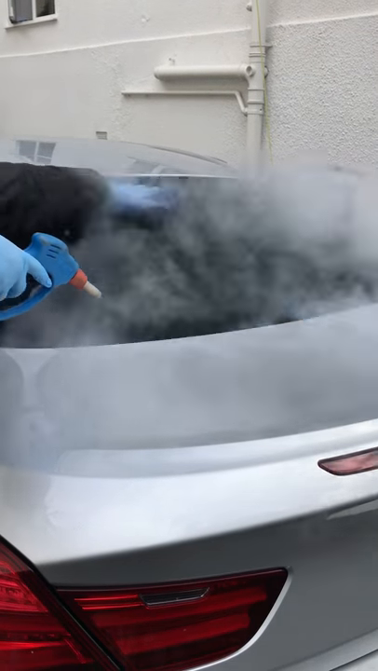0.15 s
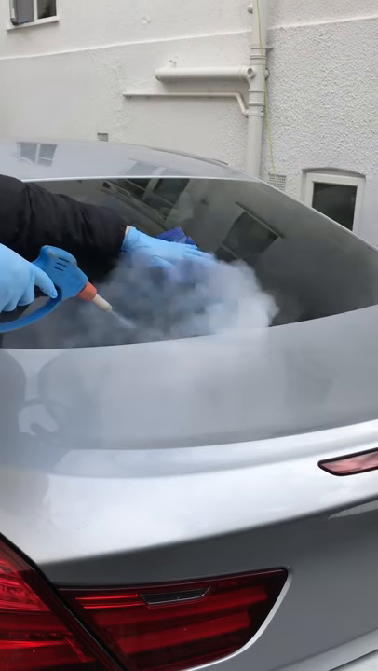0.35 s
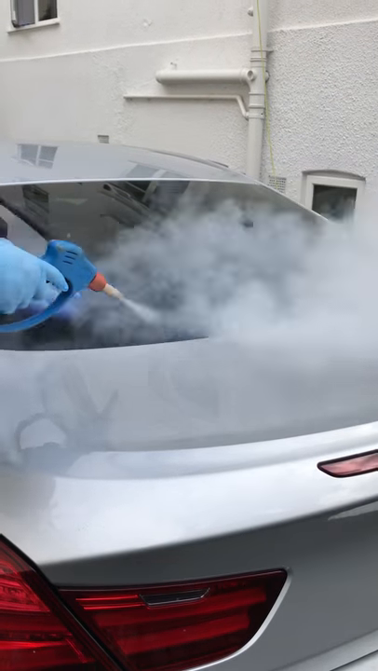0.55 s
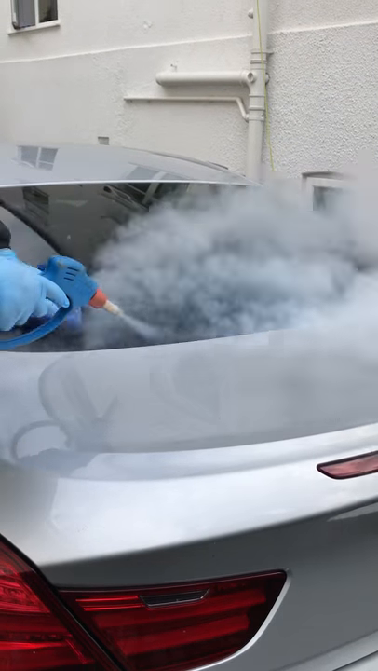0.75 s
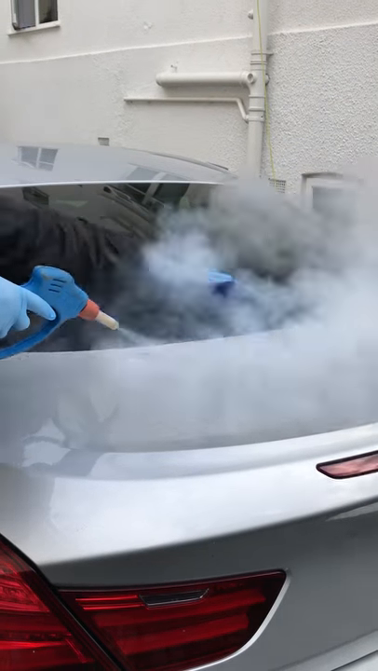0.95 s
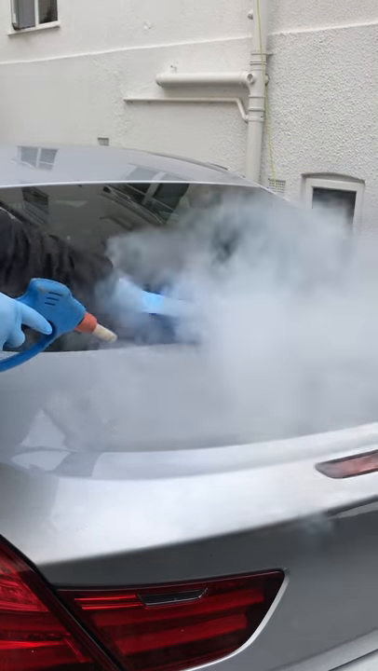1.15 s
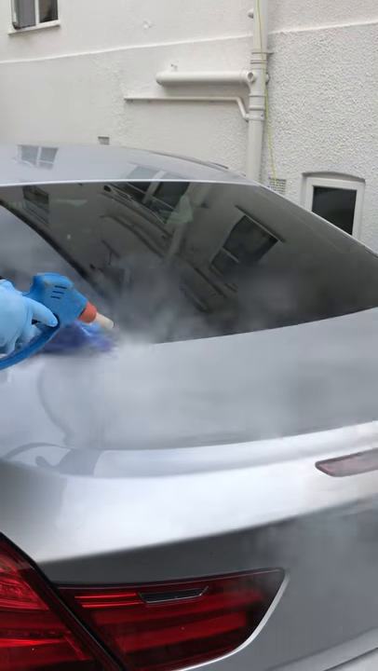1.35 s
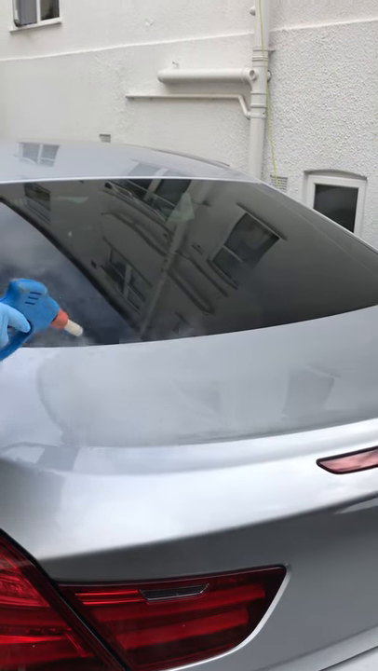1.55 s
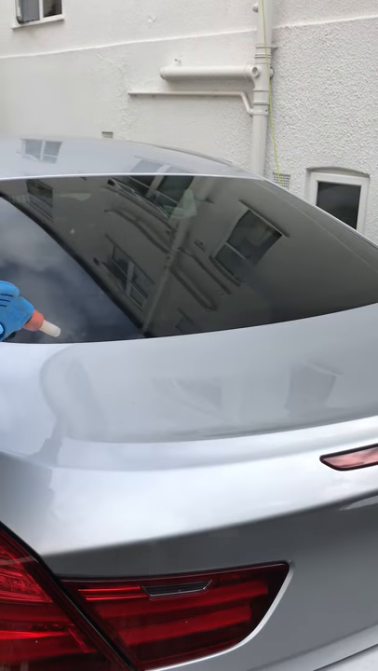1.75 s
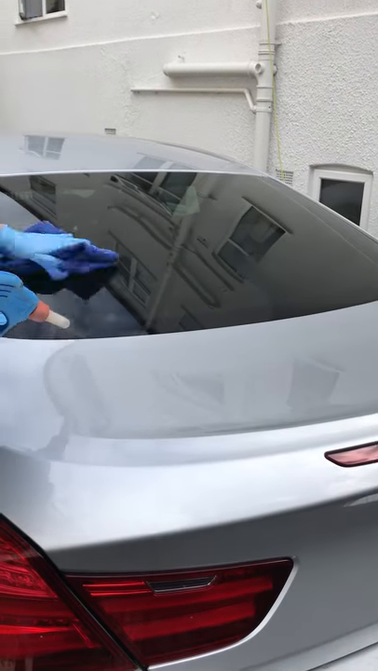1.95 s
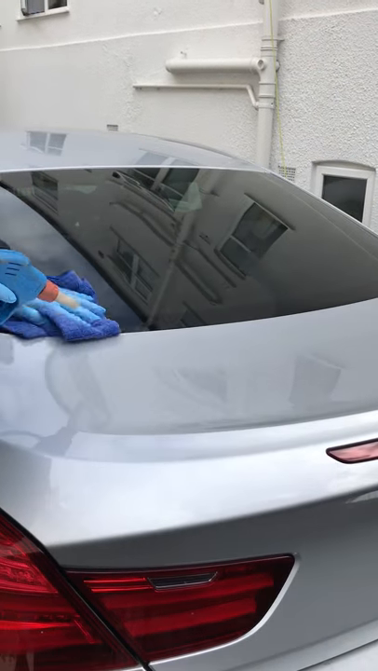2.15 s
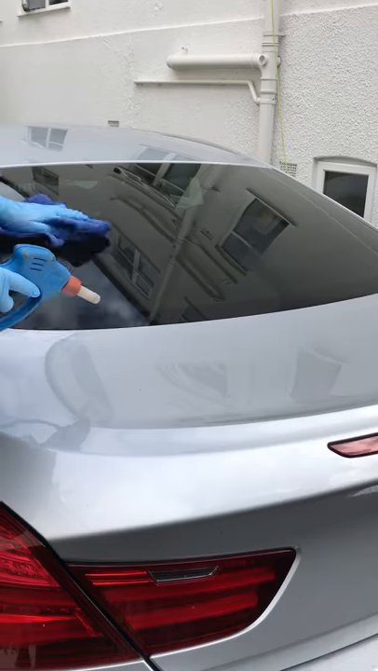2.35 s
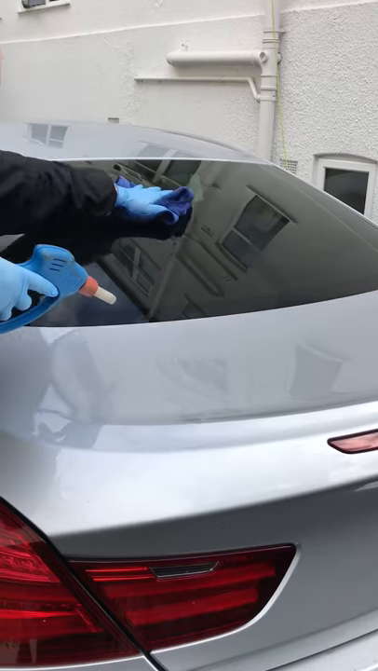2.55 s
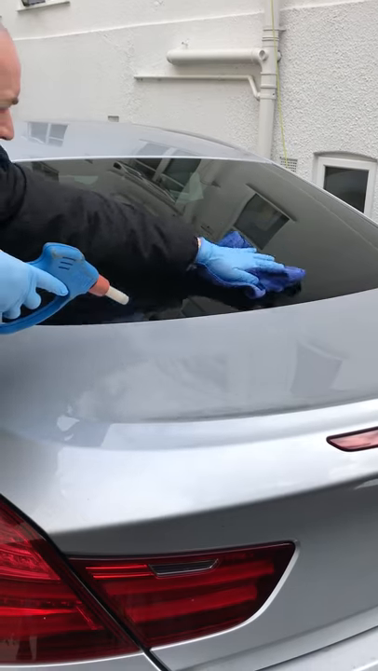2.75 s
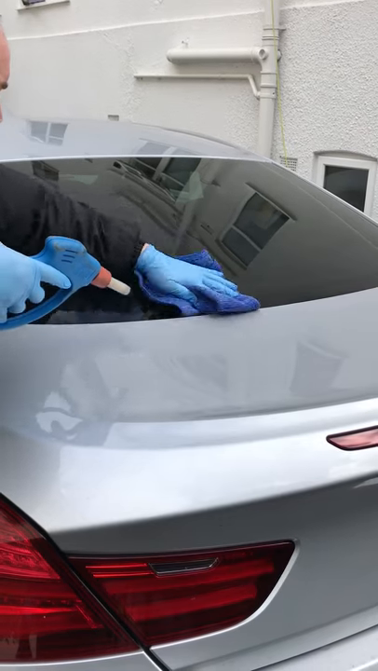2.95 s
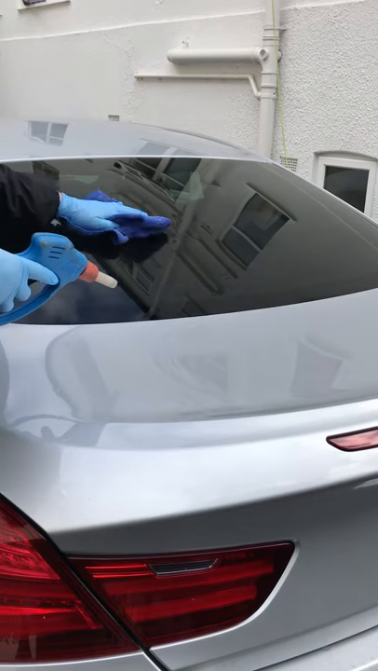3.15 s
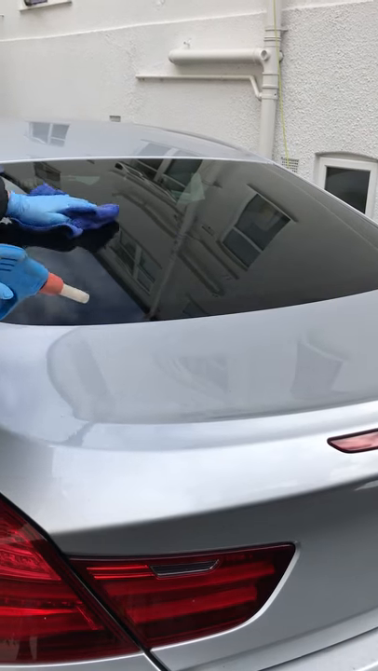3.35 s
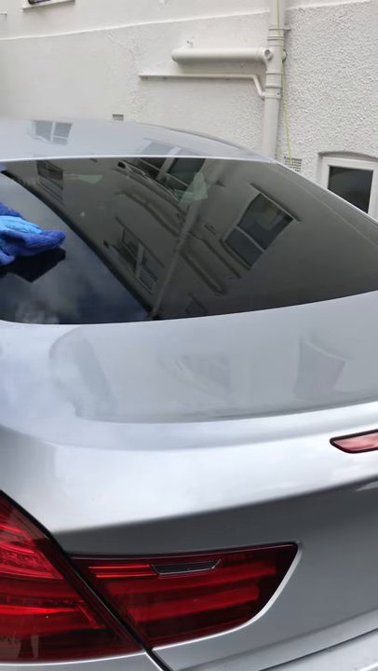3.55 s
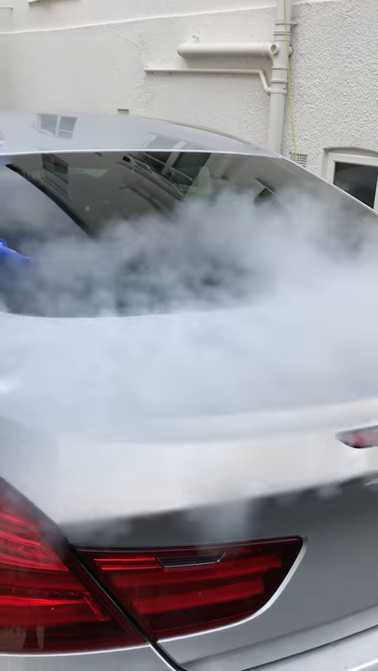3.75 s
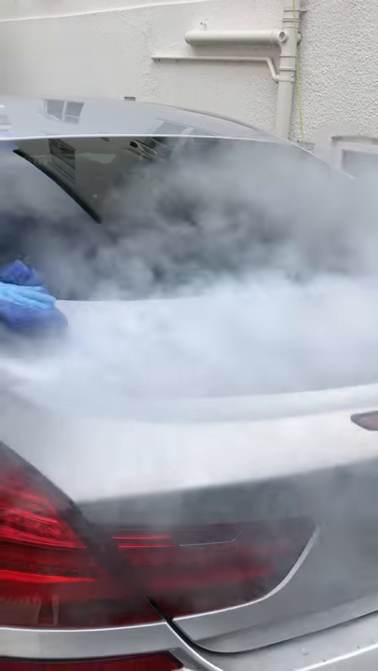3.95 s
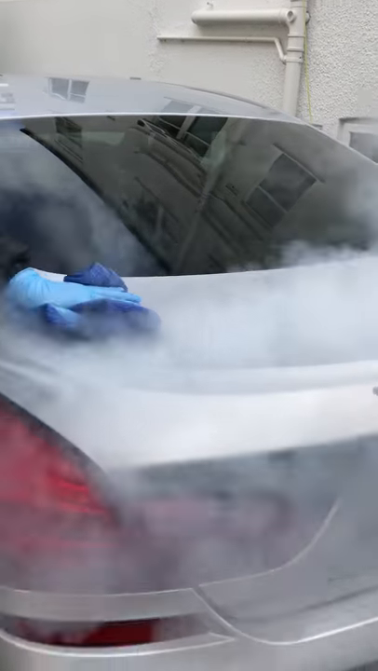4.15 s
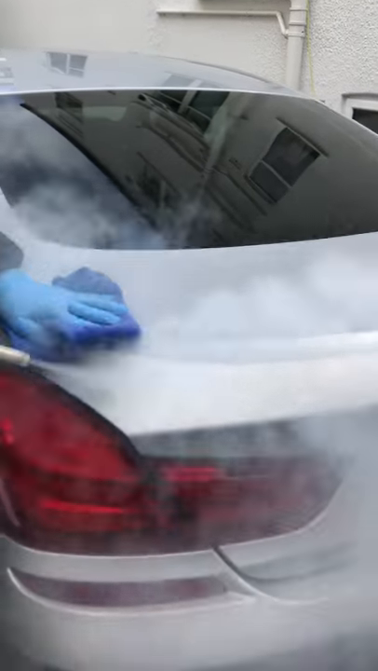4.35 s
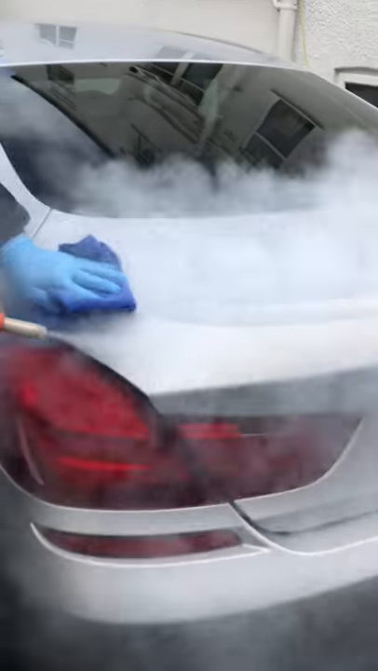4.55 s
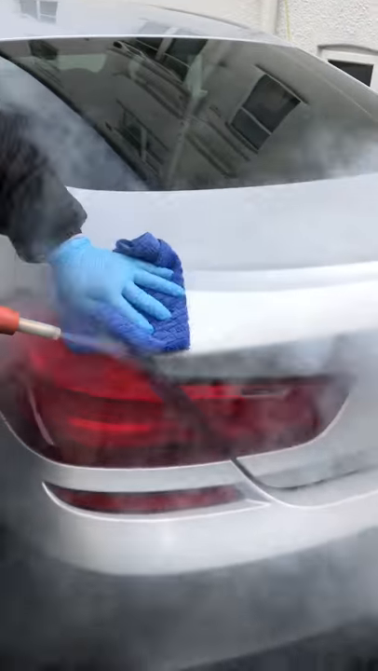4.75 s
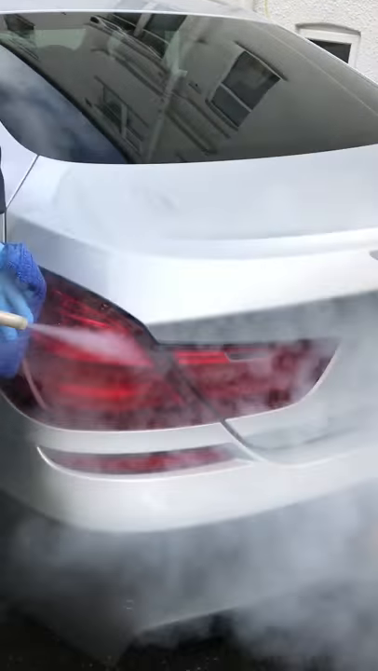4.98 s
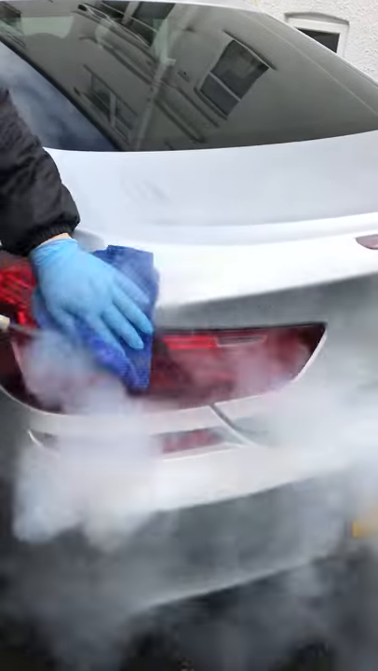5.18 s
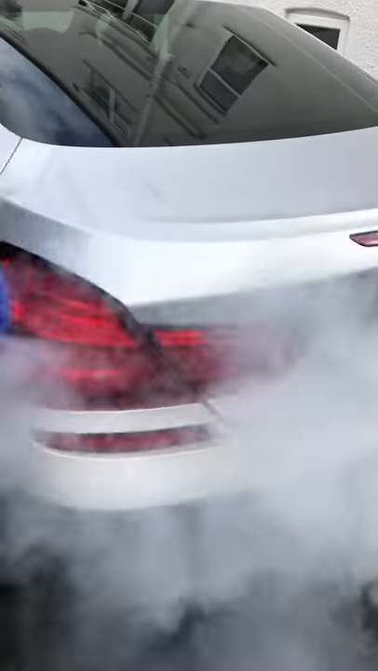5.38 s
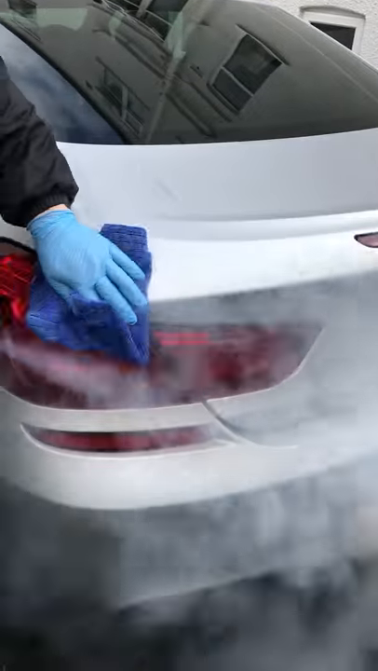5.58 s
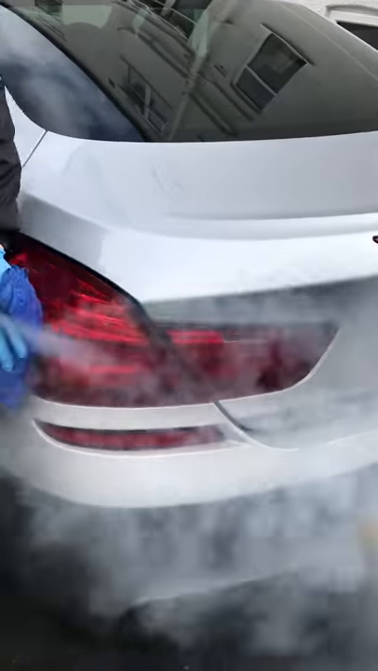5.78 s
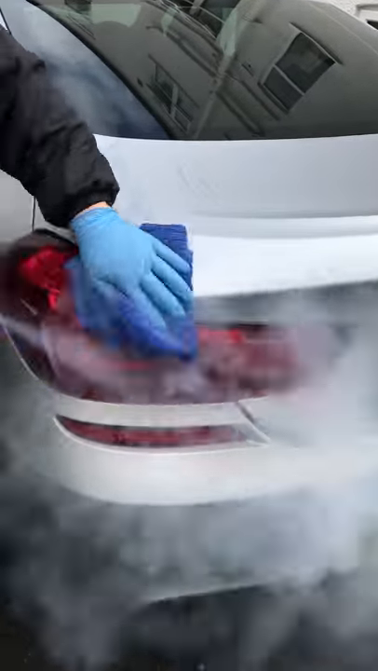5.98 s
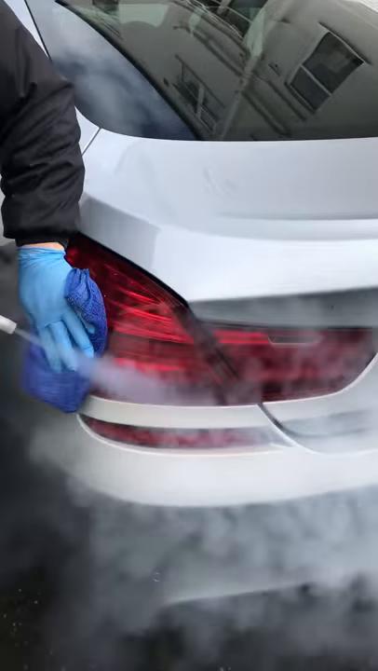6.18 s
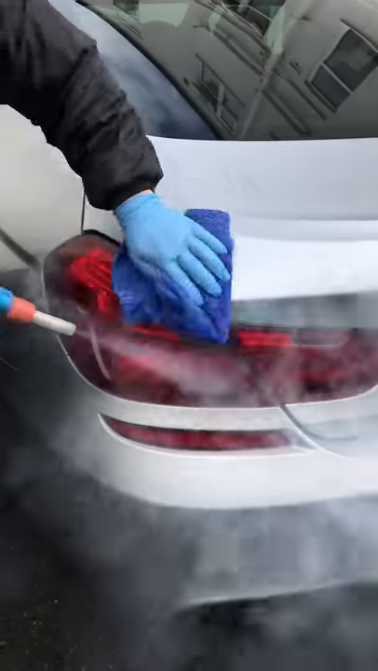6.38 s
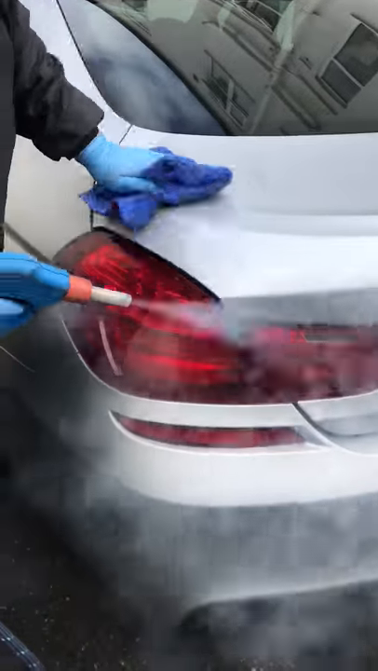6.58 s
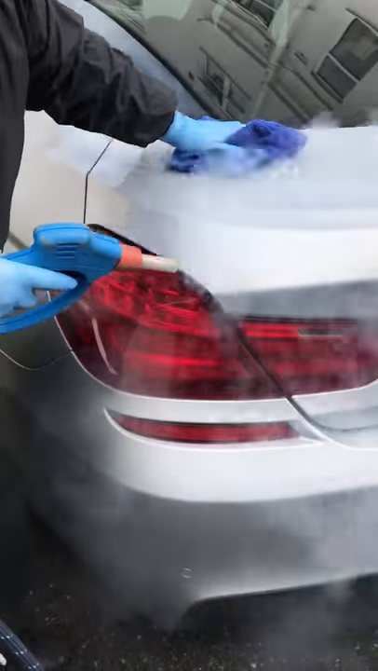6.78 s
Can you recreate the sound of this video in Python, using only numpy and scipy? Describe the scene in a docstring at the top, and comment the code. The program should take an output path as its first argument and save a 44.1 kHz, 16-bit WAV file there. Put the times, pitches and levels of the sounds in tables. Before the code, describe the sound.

A close mono pickup in an outdoor yard. A steam jet is already hissing at the start and shuts off at about 0.2 s, leaving a short fading hiss. At 0.4 s a loud, bright, sizzling blast bursts out, fluttering and roaring on the car body, with heavy low puffs of air near 1.1 s. It stops around 1.25 s and bleeds away. The pause is quiet: dull distant traffic, a very faint squeak near 1.4 s, small puffs and knocks, and soft grainy cloth strokes at 2.1, 2.3, 2.7, 3.05 and 3.6 s. Low wind rumble swells at 2.4 s with a brief deep boom. From 3.7 s the steam returns, first bright, then rough and full with low buffeting around 3.9 s, changing in colour as it moves. After 5 s it drops to a thinner, steadier hiss with hollow, shifting resonances, continuing to the end at 7 s.

```python
"""Steam gun on the back of a car

A handheld steam gun is played over a car in a yard, in three bursts, close to a mono microphone.
Coloured noise makes the nozzle's hiss, the spray's sizzle, and the roar and wash of the jet on the bodywork;
moving reflections comb it, and a bank of resonances makes it sound hollow at the tail light.
Puffs of low noise buffet the microphone; in the pauses a cloth wipes the glass over a low wind rumble and
distant traffic. The recorder's gain control ducks under the roar and creeps back up afterwards."""
import sys
import numpy as np
from scipy import signal
from scipy.fft import rfft, irfft
from scipy.io import wavfile
from scipy.ndimage import uniform_filter1d

SR = 44100
rng = np.random.default_rng(int(sys.argv[2]) if len(sys.argv) > 2 else 0)


def bounce(signal):
    """Save signal as a 16-bit WAV file at the path given by the first command-line argument."""
    frames = np.transpose(np.atleast_2d(signal))
    limited = np.clip(frames, -1, 1)
    pcm = np.round(limited * 32767).astype(np.int16)
    wavfile.write(sys.argv[1], SR, pcm)


N = 300762
TIME = np.arange(N) / SR  # s
FREQ = np.maximum(np.arange(N // 2 + 1) * SR / N, 1)  # Hz

# spectrum of the free jet's hiss: [f/Hz, relative level/dB per Hz]
HISS_SPECTRUM = [(5000, -37), (9000, -4.5), (11500, -0.5), (13000, 3.5), (16000, -0.5)]
# spectrum of the wet spray: [f/Hz, relative level/dB per Hz]
SIZZLE_SPECTRUM = [(2500, -12.5), (4500, -6), (6000, -2.5), (8500, -1), (10000, -3), (12500, -1.5),
                   (16000, -36)]
# how far the jet is aimed into the hollow around the tail light: [t/s, share 0-1]
HOLLOW_AIM = [(0, 0), (5.0, 0.38), (5.7, 1), (6.82, 0.75)]


def undb(db):
    """Level and amplitude: 20 dB is a factor of ten in gain."""
    return 10 ** (np.asarray(db) / 20)


def curve(rows, column=1):
    """Linear interpolation: one column of a table, joined by straight lines in time."""
    rows = np.array(rows)
    return np.interp(TIME, rows[:, 0], rows[:, column])


def resonance(hz, width_hz):
    """Frequency response of a two-pole resonator, 1 at its centre."""
    return 1 / (1 + 1j * (FREQ ** 2 - hz ** 2) / (FREQ * width_hz))


def filtered(x, response):
    """Convolution theorem: a filter multiplies the spectrum by its response."""
    return irfft(rfft(x) * response, N)


def noise(response):
    """Filtered white noise takes the shape of the response; scaled to rms 1."""
    x = filtered(rng.standard_normal(N), response)
    return x / x.std()


def colour(points):
    """Response through [f/Hz, level/dB] points, with skirts of 12 dB per octave outside them."""
    hz, db = np.transpose(points)
    skirts = np.minimum(FREQ / hz[0], 1) ** 2 * np.minimum(hz[-1] / FREQ, 1) ** 2
    return undb(np.interp(np.log(FREQ), np.log(hz), db)) * skirts


def walk(rate):
    """Low-passed noise as a smooth random motion of spread 1, up to about rate turns a second."""
    return noise(1 / (1 + (FREQ / rate) ** 4))


def ramp(start, length):
    """A raised-cosine step from 0 to 1."""
    return np.sin(np.pi / 2 * np.clip((TIME - start) / length, 0, 1)) ** 2


def swell(at, length):
    """A raised-cosine bell, above half height for the given length."""
    return np.cos(np.pi / 2 * np.clip((TIME - at) / length, -1, 1)) ** 2


def note(at, length, hz, db):
    """A pure tone in a bell envelope; the level is the rms at its peak."""
    return np.sqrt(2) * np.sin(2 * np.pi * hz * TIME) * undb(db) * swell(at, length)


def rings(rows):
    """Band-passed noise in bell envelopes, each shaped by two equal resonators in series."""
    total = 0
    for at, length, hz, width, db in rows:
        total = total + undb(db) * swell(at, length) * noise(resonance(hz, width) ** 2)
    return total


def decay(elapsed, t60):
    """Exponential decay that loses 60 dB in t60 seconds."""
    return np.exp(-np.log(1000) * elapsed / t60)


def tail(t60, delay):
    """Diffuse reverberation: many small reflections that die away exponentially; energy 1."""
    echo = rng.standard_normal(N) * decay(TIME, t60) * (TIME > delay)
    return rfft(echo / np.linalg.norm(echo))


def trigger():
    """The valve controls the flow: gain of nozzle and impact, slant of the jet, gain of the bleeding steam."""
    # pulls of the trigger: [opens t/s, rise/s, let go t/s, nozzle hiss level/dB]
    bursts = [(-.1, .05, .155, -15), (.405, 0.052, 1.215, -10.5), (3.66, 0.12, 7, -13)]
    # how the jet meets the car, one path a burst: [t/s, force level/dB, slant/dB]
    # slant above 0 is glancing and bright, below 0 square on and dark
    paths = [
        [(0, -16, -0.56), (.04, -8, -3.7), (.07, -17.5, -0.17), (.16, -20.5, -0.63)],
        [(.44, -31.5, 12), (.464, 0.5, -2), (.52, -0.5, 1), (.6, 1.5, -3), (.72, -6, 0.5), (.9, -2, -1),
         (1.05, 3.5, -3.5), (1.12, 0, -4), (1.2, -3.5, -3)],
        [(3.7, -36, 20), (3.745, 5.5, 7), (3.81, 3.5, 11), (3.9, 4, 2.5), (4.0, 8, -4.5), (4.27, 5, 0.5),
         (4.45, -0.5, -6), (4.7, 5.5, -0.5), (4.86, 2, -6), (4.95, -5.5, -5), (5.015, -6, -5),
         (5.028, -25, -5.5), (5.25, -24.5, 4), (5.45, -29.5, 1), (6.82, -22.5, 1.5)],
    ]
    # hand and cloth shield the nozzle's hiss: [from t/s, until t/s, fade/s, level/dB]
    shield = (5, 5.5, 0.25, -7.5)
    close_s = 0.05  # the valve takes this long to shut
    bleed_db, bleed_t60_s = -14, 0.32  # steam left in the nozzle, level against the hiss
    nozzle = impact = slant = bleeding = 0
    for (opens, rise, let_go, db), path in zip(bursts, paths):
        shut = ramp(let_go, close_s)
        valve = (ramp(opens, rise) * (1 - shut)) ** 1.08
        nozzle = nozzle + valve * undb(db)
        impact = impact + valve * undb(curve(path))
        slant = slant + (valve > 0) * curve(path, 2)
        since_shut = np.abs(TIME - let_go - close_s)
        bleeding = bleeding + shut * undb(db + bleed_db) * decay(since_shut, bleed_t60_s)
    start, end, fade, shield_db = shield
    shielded = ramp(start, fade) - ramp(end, fade)
    return nozzle * undb(shield_db * shielded), impact, slant, bleeding


def hiss(nozzle, impact, slant, eddies):
    """Jet noise: small eddies hiss at the nozzle and in the splash, with passing bands of noise."""
    splash_db, splash_per_slant = -3, 0.78  # dB against the roar, dB gained for each dB of slant
    splash = impact * undb(splash_db + splash_per_slant * slant)
    gain = np.hypot(nozzle, splash)
    return gain * undb(0.8 + 1.45 * eddies) * (noise(colour(HISS_SPECTRUM)) + jet_bands())


def droplets(rate, spread_db):
    """Shot noise: dense clicks of condensed water, of very unequal size; rms 1."""
    struck = rng.random(N) < rate / SR
    x = struck * rng.standard_normal(N) * undb(spread_db * rng.standard_normal(N))
    x = filtered(x, colour(SIZZLE_SPECTRUM))
    return x / x.std()


def sizzle(nozzle, impact, slant, eddies):
    """Wet spray sizzles: continuous bright noise with the shot noise of droplets."""
    nozzle_db, impact_db = -9.5, -1  # free jet against its hiss, impact against its roar
    gain = np.hypot(nozzle * undb(nozzle_db), impact * undb(impact_db + slant))
    spray = noise(colour(SIZZLE_SPECTRUM)) + undb(-7.0) * droplets(rate=2300, spread_db=7.0)
    return gain * undb(-0.07 + 1.1 * eddies) * spray


def roar(impact, eddies, contact):
    """Impinging-jet noise: large eddies break on the bodywork, rougher where they strike harder."""
    # [f/Hz, relative level/dB per Hz]
    roar_spectrum = [(100, 1), (400, -4.5), (700, -6.5), (1000, 0.5), (1500, -1), (2100, -1), (3100, -1),
                     (4200, -1.5), (6000, -4.5), (10000, -9.5), (16000, -33.5)]
    flutter_db = 1.12 + 2.02 * eddies + contact * 2.01 * walk(300)
    return impact * undb(flutter_db) * noise(colour(roar_spectrum))


def wash(impact, slant, eddies, contact):
    """Wall-jet noise: large eddies wash over the flat panel, weaker where the jet glances."""
    # [f/Hz, relative level/dB per Hz]
    wash_spectrum = [(30, -19.5), (70, -9), (130, -7), (200, -0.5), (300, -1.5), (420, -0.5), (580, -1.5),
                     (800, -3.5), (1500, -3.5), (4000, -40)]
    wash_db, wash_per_slant = -5.5, 0.847  # dB against the roar, dB lost for each dB of slant
    hollow_db = -4  # the tail light has no flat panel to wash over
    gain = impact * undb(wash_db - wash_per_slant * slant + hollow_db * curve(HOLLOW_AIM) ** 2)
    flutter_db = contact * (0.24 * eddies + 2.4 * walk(54))
    return gain * undb(flutter_db) * noise(colour(wash_spectrum))


def steam(nozzle, impact, slant, bleeding):
    """Turbulence is shared: common eddies make all parts of the jet flutter together."""
    eddies = 0.38 * walk(97) + 0.5 * walk(12)
    contact = (impact / impact.max()) ** 0.35  # the harder it strikes, the rougher it is
    jet = hiss(nozzle, impact, slant, eddies) + sizzle(nozzle, impact, slant, eddies)
    jet = jet + roar(impact, eddies, contact) + wash(impact, slant, eddies, contact)
    return jet + bleed(bleeding)


def panel_reflections(jet):
    """Comb filtering: two delayed copies of opposite sign interfere with the jet as their lags move."""
    # reflections off the bodywork: [t/s, first lag/ms, second lag/ms, strength 0-1]
    panels = [(0, 1.9, 1.433, 0), (3.75, 1.2, 1.504, .12), (4.6, 1.45, 1.26, 0), (5.1, 1.575, 1.69, 0.38),
              (5.75, 1.176, 1.72, 0.08), (6.82, 1.1, 1.74, 0.06)]
    first = np.interp(TIME - curve(panels, 1) / 1000, TIME, jet)
    second = np.interp(TIME - curve(panels, 2) / 1000, TIME, jet)
    return jet + curve(panels, 3) * (first - second)


def tail_light_hollow(jet):
    """Cavity resonance: the modes of the hollow ring under the broadband jet."""
    # [f/Hz, width/Hz, mean level/dB]
    modes = [(276.5, 34.8, 2.5), (651, 153, 6), (1300, 190, -8), (2150, 110, -3), (2604, 178, -3.5),
             (3058, 208, -1.5), (3794, 200, -6), (4340, 260, -4), (5840, 270, -8), (9530, 130, -18.5)]
    total = 0
    for hz, width, db in modes:
        # hand and cloth pass over the hollow, so each mode comes and goes and slides up and down
        up = (1 + np.tanh(1.17 * walk(3.5))) / 2
        low = filtered(jet, resonance(hz - width * 0.307, width))
        high = filtered(jet, resonance(hz + width * 0.307, width))
        total = total + undb(db + 5.4 * walk(3.5)) * ((1 - up) * low + up * high)
    return total


def bodywork(jet):
    """Superposition: the hollow adds to the combed jet, which weakens as the aim enters it."""
    aim = curve(HOLLOW_AIM)
    return panel_reflections(jet) * undb(-1.5 * aim) + aim * tail_light_hollow(jet)


def yard(x):
    """Scattering: car and ground return sound at once, shifting with the gun; house walls add a faint tail."""
    turn = np.pi * 1.1 * TIME  # crossfades two unlike scatterings as the gun moves
    near = np.cos(turn) * filtered(x, tail(t60=0.028, delay=0.0038))
    near = near + np.sin(turn) * filtered(x, tail(t60=0.089, delay=0.0025))
    far = filtered(x, tail(t60=0.62, delay=0.015))
    return x + undb(-14 + 4.2 * curve(HOLLOW_AIM)) * near + undb(-34) * far


def buffets(impact, slant):
    """Wind noise: puffs of air and the draught of the deflected jet tumble over the microphone port."""
    # puffs: [t/s, length/s, level/dB]
    puffs = [(.03, 0.082, -19.5), (1.077, 0.035, 11.5), (1.174, .039, 5), (1.661, .045, -29.5),
             (1.785, 0.071, -26.5), (1.862, 0.0428, -19), (1.938, 0.0136, -24), (2.003, .04, -26),
             (3.848, 0.0228, 8), (3.961, 0.0735, 9), (4.944, .05, 0.5)]
    # [f/Hz, relative level/dB per Hz]
    puff_spectrum = [(20, -26), (45, -0.5), (75, 1), (130, -4), (250, -8.5), (450, -17.5), (900, -42),
                     (3000, -62.5)]
    draught_db = -16.5  # against the roar
    force = sum(undb(db) * swell(at, length) for at, length, db in puffs)
    draught = undb(draught_db - slant) * impact
    return np.hypot(force, draught) * noise(colour(puff_spectrum))


def rumble():
    """Amplitude modulation: low wind rumble throbs unevenly and once swells to a clean note."""
    # [t/s, mean level/dB]
    rumble_level = [(0, -45.5), (2.3, -38), (2.36, -27.5), (3.7, -27), (5.3, -37.5), (6.82, -27.5)]
    # [f/Hz, relative level/dB per Hz]
    rumble_spectrum = [(20, -33), (38, -45), (52, 5.5), (66, -5), (88, 1.5), (110, -9), (140, -25.5),
                       (250, -33)]
    # the clean note: [t/s, length/s, f/Hz, level/dB]
    boom = (2.42, .11, 64, -18)
    throb = noise(resonance(8.2, 2.6))
    return undb(curve(rumble_level) + 2.4 * throb) * noise(colour(rumble_spectrum)) + note(*boom)


def street():
    """Diffuse background noise: distant traffic, dull and wavering slightly."""
    # [f/Hz, relative level/dB per Hz]
    street_spectrum = [(60, -7), (130, -2.5), (220, -10), (335, -3.5), (480, -9), (750, -13), (1150, -13),
                       (1800, -20.5), (3300, -25), (6000, -30), (9500, -35.5), (16000, -43)]
    return undb(-38.5 + 0.5 * walk(16.5)) * noise(colour(street_spectrum))


def bleed(bleeding):
    """Exponential discharge: steam left in the nozzle hisses and sizzles away after the valve shuts."""
    return bleeding * (noise(colour(HISS_SPECTRUM)) + noise(colour(SIZZLE_SPECTRUM)))


def jet_bands():
    """Passing bands of noise: a broad bright swell, a low hump of the roar sliding down, short coloured swells."""
    # [t/s, length/s, f/Hz, width/Hz, level over the hiss/dB]
    bands = [(.51, 0.23, 10020, 2000, 1.5), (3.78, 0.13, 8270, 600, -9), (3.97, 0.11, 495, 450, 2),
             (4.6, 0.43, 533.6, 279, -3), (4.87, 0.092, 387, 220, 5.5), (4.96, 0.0585, 251, 150, 5.5),
             (5.9, 0.29, 1380, 402, -17.5), (6.13, .098, 6120, 1200, -15), (6.56, 0.102, 6060, 900, -9),
             (6.78, 0.186, 760.6, 174, -9.5)]
    return rings(bands)


def cloth():
    """Friction: a damp cloth rubs the glass in soft, grainy strokes and squeaks once in two harmonics."""
    # strokes: [t/s, length/s, level/dB]
    wipes = [(2.114, .1, -52.5), (2.27, 0.122, -50), (2.69, .18, -51), (3.05, .08, -56), (3.57, 0.285, -48)]
    # [f/Hz, relative level/dB per Hz]
    cloth_spectrum = [(800, -8.5), (2500, 1.5), (5500, -0.5), (9000, -6.5), (15000, -12)]
    # [t/s, length/s, f/Hz, level/dB, level of the octave/dB]
    squeak_row = (1.43, .16, 945, -48, -53)
    pressure = sum(undb(db) * swell(at, length) for at, length, db in wipes)
    rubbing = pressure * undb(1.5 * walk(90)) * noise(colour(cloth_spectrum))
    at, length, hz, db, octave_db = squeak_row
    squeak = note(at, length, hz, db) + note(at, length, 2 * hz, octave_db)
    return rubbing + squeak


def handling():
    """Contact noise: a small squeak of the cloth on the glass, and ticks and knocks of hand and gun, as short
    bands of noise."""
    # [t/s, length/s, f/Hz, width/Hz, level/dB]
    contacts = [(1.748, 0.015, 6870, 9000, -52), (1.868, 0.0097, 480, 450, -35),
                (2.27, .028, 329, 160, -30), (2.465, 0.0266, 9640, 600, -53),
                (2.465, 0.027, 5500, 300, -53.5), (3.597, .007, 790, 400, -35),
                (3.597, .007, 9000, 9000, -47.5)]
    return rings(contacts)


def scene():
    """Superposition: all sounds add at one microphone, the same on both channels."""
    nozzle, impact, slant, bleeding = trigger()
    jet = yard(bodywork(steam(nozzle, impact, slant, bleeding)))
    mono = jet + buffets(impact, slant) + rumble() + street() + cloth() + handling()
    return np.array([mono, mono])


def gain_control(x):
    """Compression: takes off a share of the excess over a threshold, then recovers at a steady rate."""
    threshold_db, squeeze, recover_db_per_s = -20, 0.69, 22.5  # squeeze: share of the excess
    detector_hz, detector_s = 300, 0.0216  # the detector rolls off below this pitch, averages this long
    window = int(detector_s * SR)
    heard = filtered(x[0], np.minimum(FREQ / detector_hz, 1) ** 2)
    level_db = 10 * np.log10(np.maximum(uniform_filter1d(heard ** 2, window), 1e-12))
    wanted_db = squeeze * np.maximum(level_db - threshold_db, 0)
    recovery_db = recover_db_per_s * TIME
    # a running maximum on a rising slope: the cut jumps up and falls steadily
    cut_db = np.maximum.accumulate(wanted_db + recovery_db) - recovery_db
    return x * undb(-uniform_filter1d(cut_db, window))


def record(dry):
    """Recording chain: port notches, gain control, saturation of the peaks and a low-pass filter."""
    # dips in the microphone's response: [f/Hz, width/Hz, depth 0-1]
    port_dips = [(4840, 230, 0.26), (7696, 540, 0.31), (10443, 330, 0.48)]
    port = np.prod([1 - depth * resonance(hz, width) for hz, width, depth in port_dips], axis=0)
    x = gain_control(filtered(dry, port)) * undb(0.47)
    x = x / (1 + x ** 6) ** (1 / 6)  # rounds the loudest peaks
    low_pass = signal.ellip(12, 0.1, 70, 16000, fs=SR, output="sos")
    return signal.sosfilt(low_pass, x)


dry = scene()
out = record(dry)
bounce(out)
```